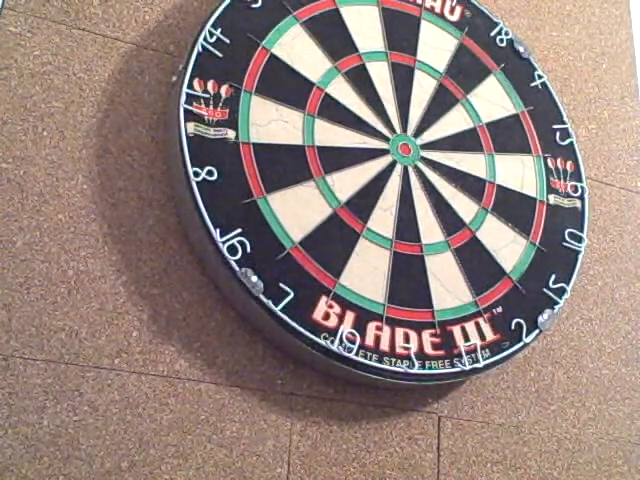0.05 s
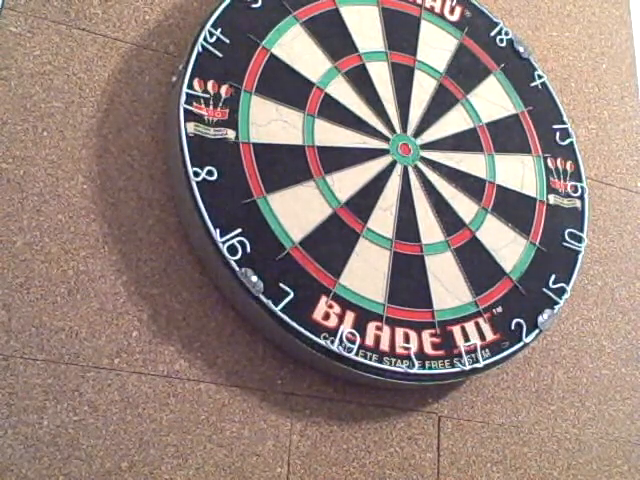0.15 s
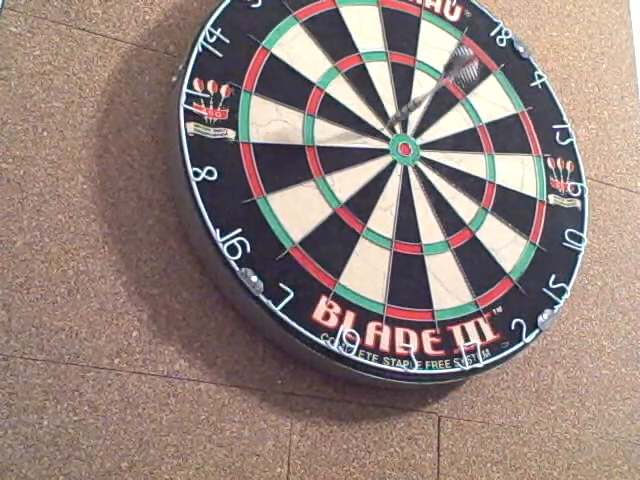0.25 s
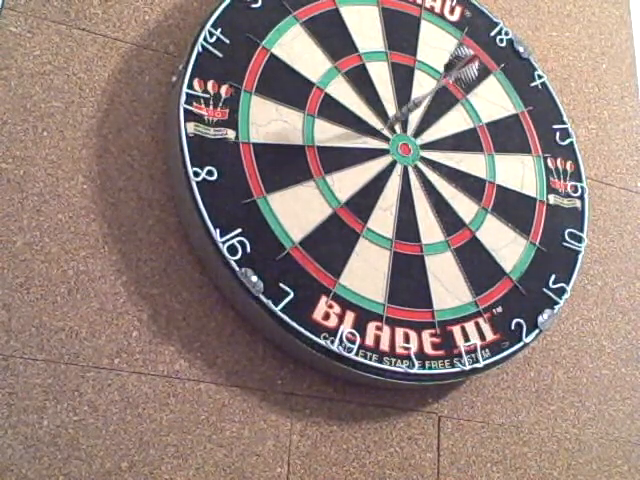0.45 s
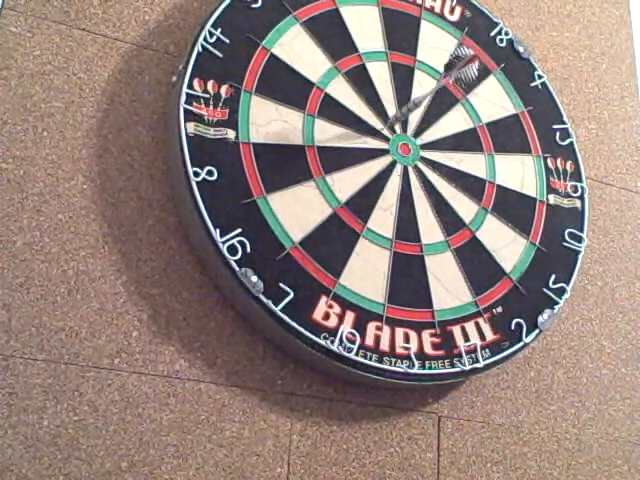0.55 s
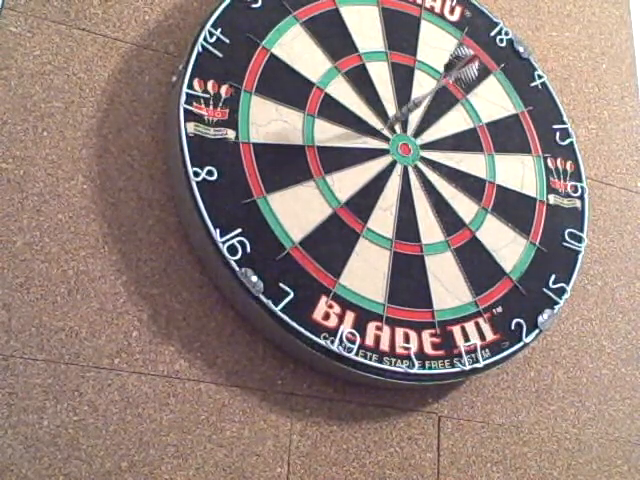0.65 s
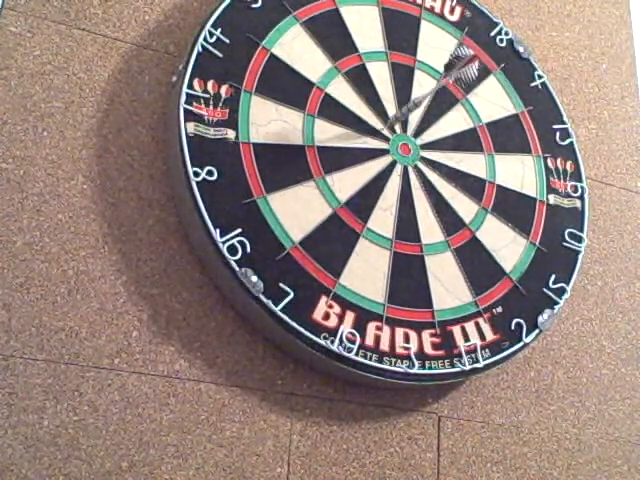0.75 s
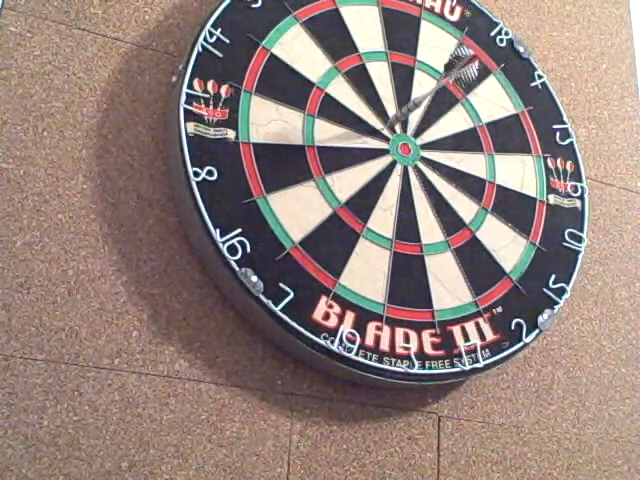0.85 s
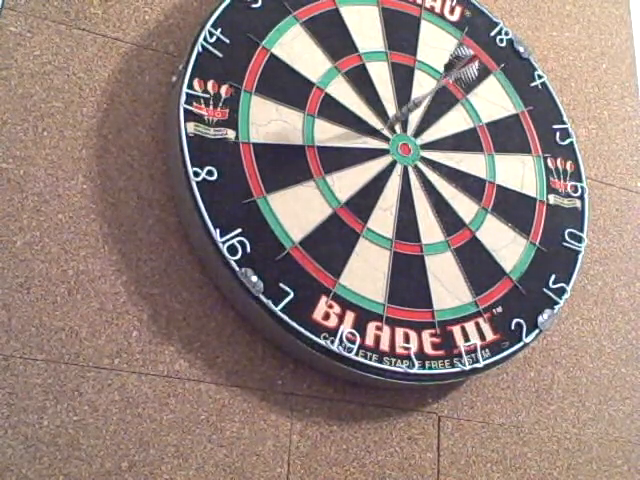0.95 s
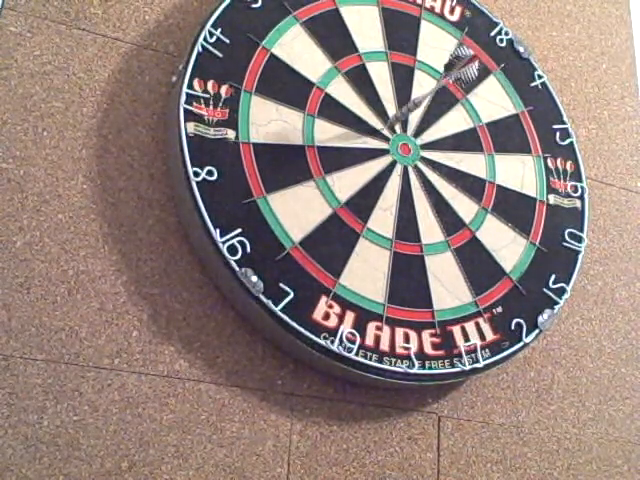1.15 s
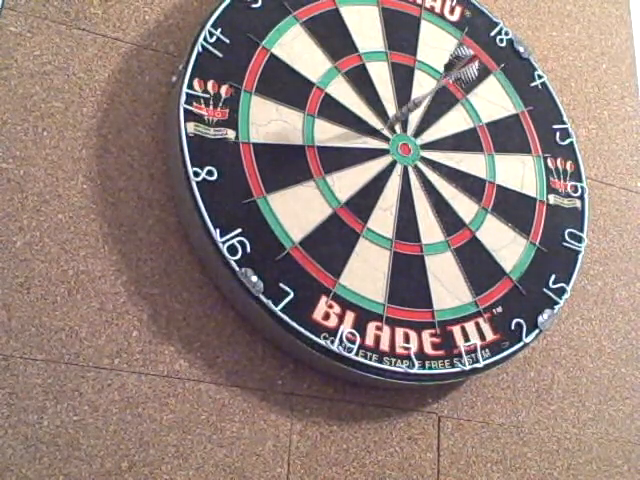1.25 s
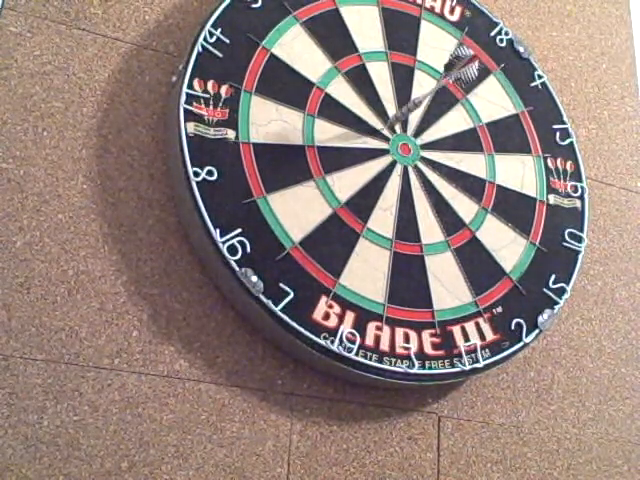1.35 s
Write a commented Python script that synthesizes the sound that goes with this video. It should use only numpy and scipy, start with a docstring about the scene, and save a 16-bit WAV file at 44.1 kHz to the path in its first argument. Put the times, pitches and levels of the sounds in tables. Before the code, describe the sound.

A dart thuds into a bristle board with a short crunch and a low wall boom.

```python
"""In a small, quiet room a dart sticks in a bristle board that hangs on a cork-faced wall.
The point crunches into the fibres (grainy noise burst), the barrel stops with a knock (decaying modes),
the flight rattles (short noise slaps) and the wall booms (swelling low modes), with a diffuse echo.
Around it: low rumble, hiss, a thin electrical whine and a few faint rustles, probably the thrower's
sleeve, made of shaped noise and steady sines."""
import sys
import numpy as np
from scipy import signal
from scipy.fft import rfft, irfft
from scipy.io import wavfile

SR = 44100
rng = np.random.default_rng(int(sys.argv[2]) if len(sys.argv) > 2 else 0)


def wrap_up_sound(samples):
    """Save the sound to the file named by the first command line argument, as 16-bit audio."""
    columns = np.atleast_2d(samples).T
    # keep every value between -1 and 1, then stretch to whole-number steps
    tamed = np.clip(columns, -1, 1)
    steps = np.round(tamed * 32767).astype(np.int16)
    wavfile.write(sys.argv[1], SR, steps)


N = 61739  # length in samples

HIT_S = 0.2335  # the point touches the board


def amp(db):
    """Level: decibels to an amplitude ratio."""
    return 10 ** (np.asarray(db) / 20)


def unit(x):
    """Normalization: scales a signal to rms 1."""
    return x / np.sqrt(np.mean(x ** 2) + 1e-20)


def read(points, hz):
    """Interpolation: reads a table on a log-frequency axis, flat beyond its ends."""
    f, value = np.transpose(points)
    return np.interp(np.log(hz + 1), np.log(f + 1), value)


def since(start):
    """Causality: seconds elapsed since start, zero before it."""
    return np.maximum(np.arange(N) / SR - start, 0)


def fade(t, t60):
    """Exponential damping: the amplitude falls by 60 dB in t60 seconds."""
    return np.exp(-np.log(1000) * t / t60)


def noise(colour):
    """Spectral shaping: Gaussian noise weighted by a table of levels, then set to rms 1."""
    hz = np.fft.rfftfreq(N, 1 / SR)
    spectrum = rfft(rng.standard_normal(N)) * amp(read(colour, hz))
    return unit(irfft(spectrum, N))


def drift(rate_hz):
    """Low-pass random process: zero-mean fluctuation of rms 1, rolled off around rate_hz."""
    hz = np.fft.rfftfreq(N, 1 / SR)
    lowpass = (hz > 0) * np.exp(-(hz / rate_hz) ** 2)
    return unit(irfft(rfft(rng.standard_normal(N)) * lowpass, N))


def background():
    """Stationary noise and tones: sagging room rumble, slightly wavering hiss and a thin whine."""
    # rumble spectrum: f/Hz, relative level per hertz/dB
    rumble_colour = [(10, 2.5), (25, 3.5), (45, -11.5), (95, -13), (150, -21), (280, -26), (550, -32),
                     (1000, -37.5), (2500, -45), (8000, -70)]
    # hiss spectrum: f/Hz, relative level per hertz/dB
    hiss_colour = [(500, -8.5), (3000, -6), (5000, -3), (6600, 2.5), (7500, -0.5), (8000, -10.5),
                   (8500, -8.5), (9000, -45)]
    # slow course of the hiss: t/s, rms level/dB before the waver
    hiss_course = [(0, -67), (.36, -70), (.52, -68), (.9, -67.5), (1.04, -70.5), (1.4, -70)]
    # electrical whine: f/Hz, rms level/dB
    whine_tones = [(7597, -90.5), (7656, -79.5)]
    rumble_start_db, rumble_sag_db_per_s = -49, -2
    waver_db, waver_hz = 0.45, 8  # rms depth and rate of the hiss waver

    t = since(0)
    rumble = amp(rumble_start_db + rumble_sag_db_per_s * t) * noise(rumble_colour)
    hiss_db = np.interp(t, *np.transpose(hiss_course)) + waver_db * drift(waver_hz)
    hiss = amp(hiss_db) * noise(hiss_colour)
    whine = 0
    for hz, db in whine_tones:
        cycles = hz * t + rng.random()  # random starting phase
        whine = whine + amp(db) * np.sqrt(2) * np.sin(2 * np.pi * cycles)
    return rumble + hiss + whine


def sleeve():
    """Friction noise: soft brushes of cloth, each a linear rise and an exponential decay."""
    # rustles: start t/s, rise/s, t60/s, level/dB
    rustles = [(.002, 0.0024, 0.45, -64), (.688, 0.013, 0.051, -61), (.805, 0.013, 0.34, -63.5),
               (.890, 0.0042, 0.062, -64), (1.115, .015, .15, -65), (1.2011, .0005, 0.12, -58.5)]
    # cloth spectrum: f/Hz, relative level per hertz/dB
    cloth_colour = [(500, -18.5), (3000, -17.5), (4600, -6.5), (5600, -11), (6700, 5.5), (7600, -5.5),
                    (8800, -28.5)]

    shape = 0
    for start, rise, t60, db in rustles:
        attack = np.minimum(since(start) / rise, 1)
        shape = shape + amp(db) * attack * fade(since(start + rise), t60)
    return shape * noise(cloth_colour)


def crunch():
    """Fracture noise: the point tears through the fibres in a short burst of fast random grain."""
    # crunch spectrum: f/Hz, relative level per hertz/dB
    crunch_colour = [(200, -22), (900, 10.5), (2500, 12), (4500, 3), (6700, 11.5), (8000, 4), (9000, -44)]
    level_db, rise_s, length_s = -37.5, 0.00053, 0.014
    grain_depth, grain_hz = 0.66, 720

    t = since(HIT_S)
    shape = np.minimum(t / rise_s, 1) * np.exp(-(t / length_s) ** 4)
    grain = 1 + grain_depth * drift(grain_hz)
    return amp(level_db) * shape * grain * noise(crunch_colour)


def wall():
    """Modal superposition: the board shoves the wall inward; close low modes swell and beat."""
    # slow modes of the board on its wall: f/Hz, level/dB before swell and decay, t60/s, swell/s
    wall_modes = [(45.98, -14, 0.59, 0.017), (55.68, -16.5, 0.53, 0.028), (83.2, -38.5, 0.71, .01),
                  (130.9, -30.5, 0.51, 0.038), (153.7, -32, 0.49, 0.034), (172.5, -38.5, 0.5, 0.031),
                  (209, -49.5, 0.56, 0.051), (297.4, -28, 0.19, .03), (312.8, -28.5, 0.14, 0.021),
                  (536, -31.5, 0.14, 0.0099)]
    lag_s = 0.00049

    t = since(HIT_S + lag_s)
    boom = 0
    for hz, db, t60, swell in wall_modes:
        envelope = (1 - np.exp(-t / swell)) * fade(t, t60)
        boom = boom + amp(db) * envelope * np.sin(2 * np.pi * hz * t)
    return -boom  # inward: the first swing is negative


def room():
    """Diffuse reverberation: dense reflections of the hit as decaying noise, the treble dying first."""
    # echo spectrum: f/Hz, relative level per hertz/dB
    echo_colour = [(100, 0.5), (245, -6.5), (310, 1.5), (420, -6.5), (560, 1), (720, 1), (950, 5.5),
                   (1250, -7), (1750, -4), (2200, -7), (3100, -15.5), (4000, -19), (5300, -18.5),
                   (6800, -7.5), (7800, -23.5), (9000, -39.5)]
    # reverberation time: f/Hz, t60/s
    echo_t60 = [(100, 0.68), (300, 0.52), (900, 0.32), (2000, 0.26), (4000, 0.25), (7000, .19)]
    level_db, lag_s, rise_s = -33, 0.0039, 0.0078

    start = HIT_S + lag_s
    hz, t, bands = signal.stft(noise(echo_colour), SR, nperseg=512)
    bands = bands * fade(np.maximum(t - start, 0), read(echo_t60, hz)[:, None])
    tail = signal.istft(bands, SR)[1][:N]
    return amp(level_db) * (1 - np.exp(-since(start) / rise_s)) * tail


def knock():
    """Impulsive excitation of modes: the dart stops dead and rings briefly with the board's face."""
    # modes of dart and face: f/Hz, relative level/dB, t60/s
    knock_modes = [(492, -11.5, 0.06), (1218, -4, 0.02), (1480, 1.5, .01), (1720, 1.5, 0.015),
                   (3144, -9.5, 0.02), (4160, -15, 0.0034), (6800, -22.5, .006)]
    stop_s, peak_db = 0.0055, -17  # delay from touch to stop; peak level of the summed ring

    t = since(HIT_S + stop_s)
    ring = 0
    for hz, db, t60 in knock_modes:
        ring = ring + amp(db) * fade(t, t60) * np.sin(2 * np.pi * hz * t)
    return amp(peak_db) * ring / abs(ring).max()


def flight():
    """Repeated impacts: the plastic flight slaps in its slot as the shaft quivers, in bright bursts."""
    # slaps: t/s, level/dB before rise and decay
    slaps = [(0.2472, -44), (0.248, -41), (0.253, -38.5), (.2600, -52)]
    # slap spectrum: f/Hz, relative level per hertz/dB
    slap_colour = [(1000, -32), (4800, -14.5), (6200, 5), (6900, 4), (7600, -11), (9000, -48)]
    rise_s, t60_s = 0.0009, 0.012

    shape = 0
    for start, db in slaps:
        t = since(start)
        shape = shape + amp(db) * np.minimum(t / rise_s, 1) * fade(t, t60_s)
    return shape * noise(slap_colour)


def scene():
    """Linear superposition: the quiet room, the hit and its echo add in one channel."""
    surroundings = background() + sleeve()
    hit = crunch() + wall() + knock() + flight()
    return (surroundings + hit + room())[None]


def record(dry):
    """Band limitation: the recorder's linear-phase low-pass filter."""
    edge_hz = 8950
    taps = signal.firwin(511, edge_hz, window=("kaiser", 9), fs=SR)
    return signal.oaconvolve(dry, taps[None], "same")


dry = scene()
out = record(dry)
wrap_up_sound(out)
```